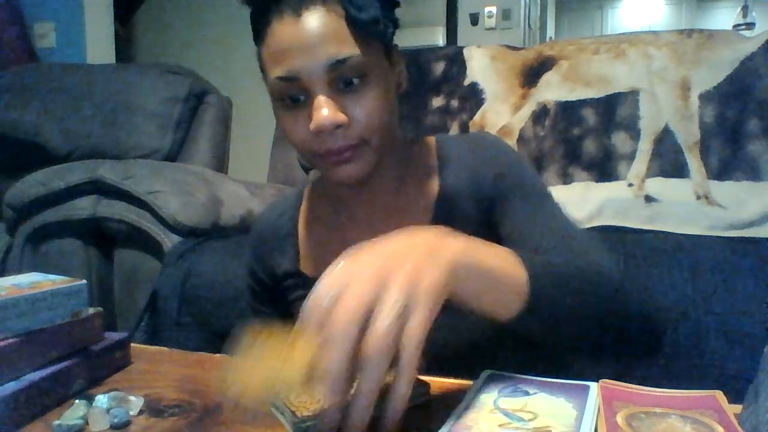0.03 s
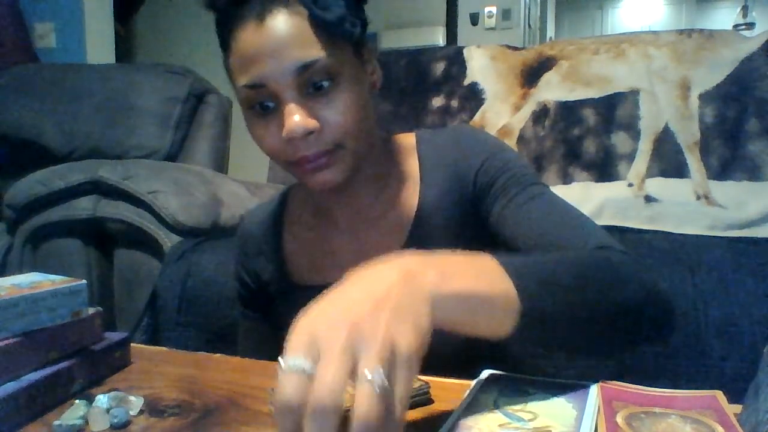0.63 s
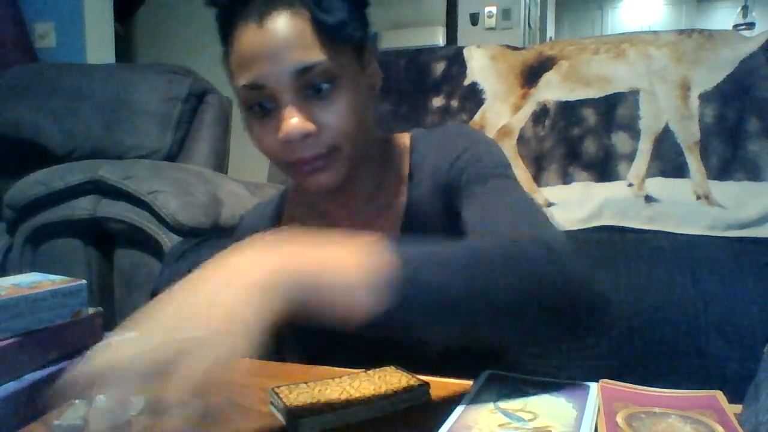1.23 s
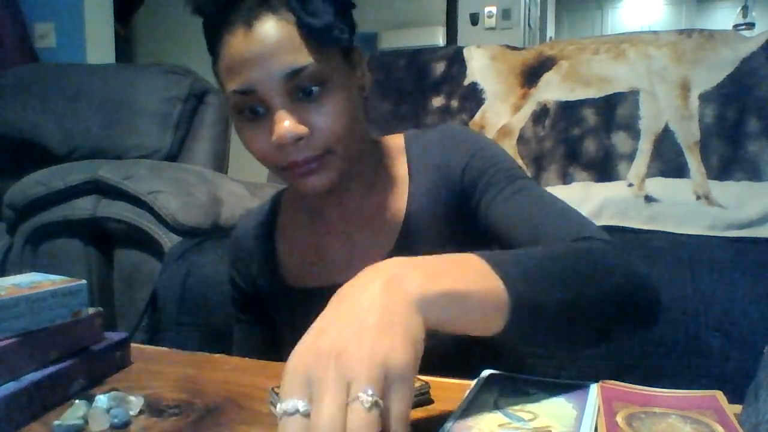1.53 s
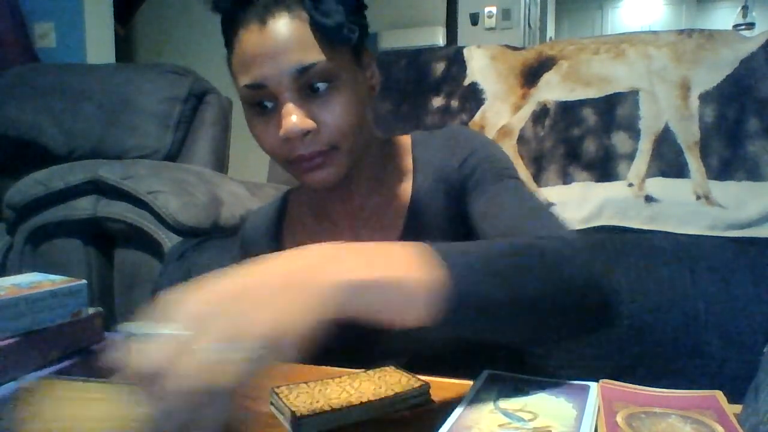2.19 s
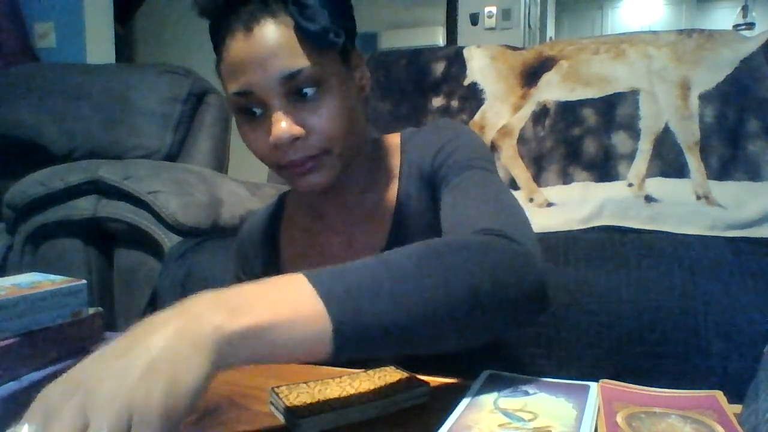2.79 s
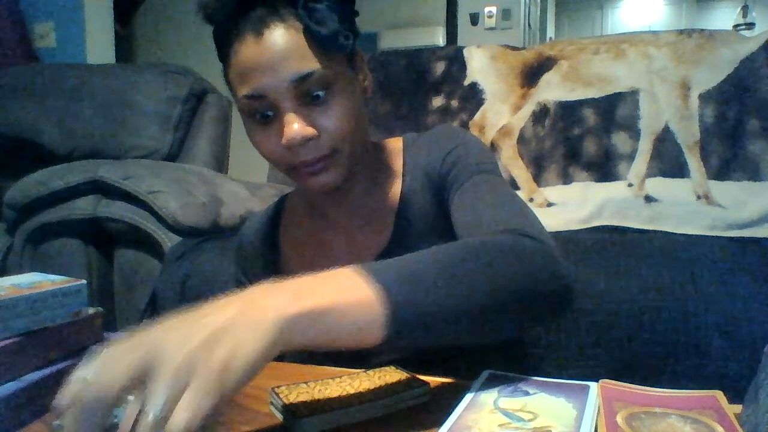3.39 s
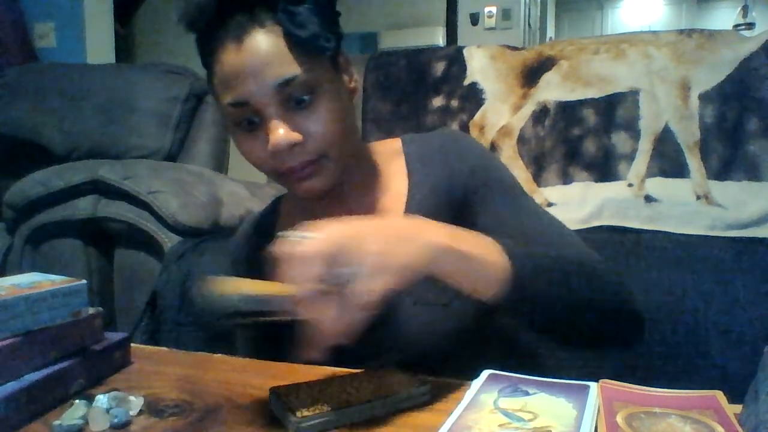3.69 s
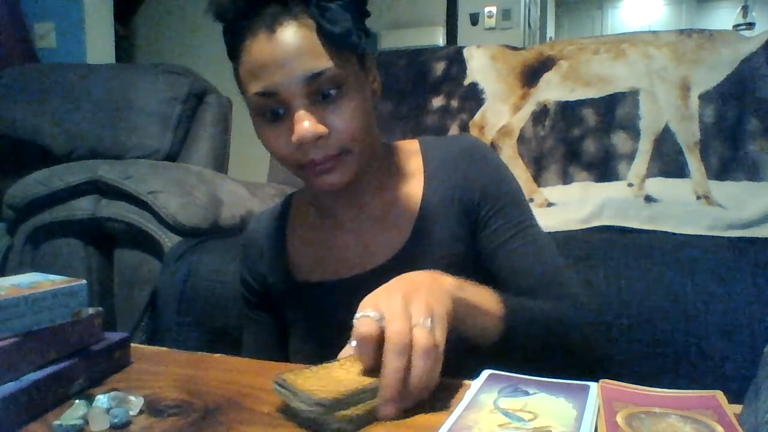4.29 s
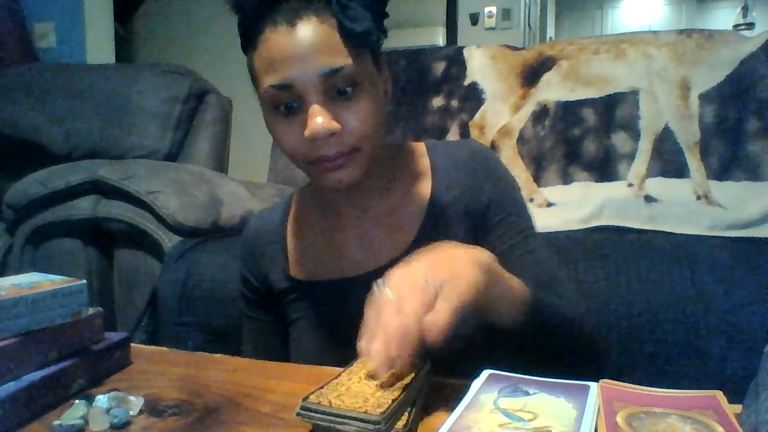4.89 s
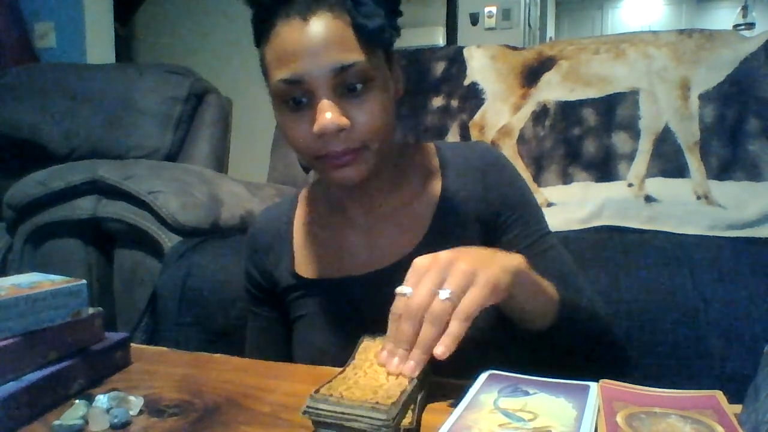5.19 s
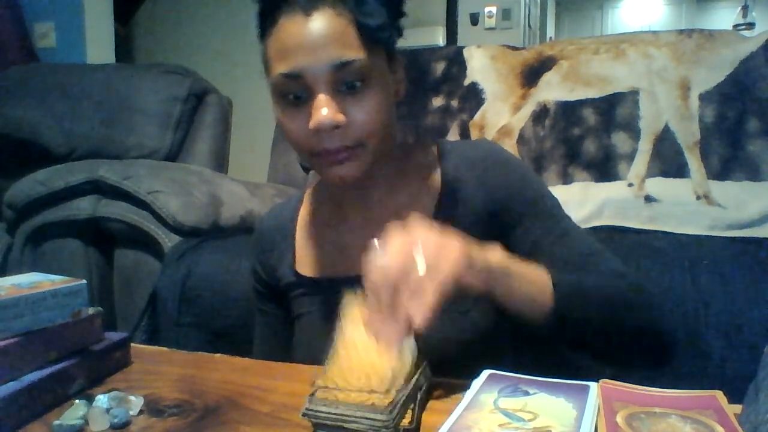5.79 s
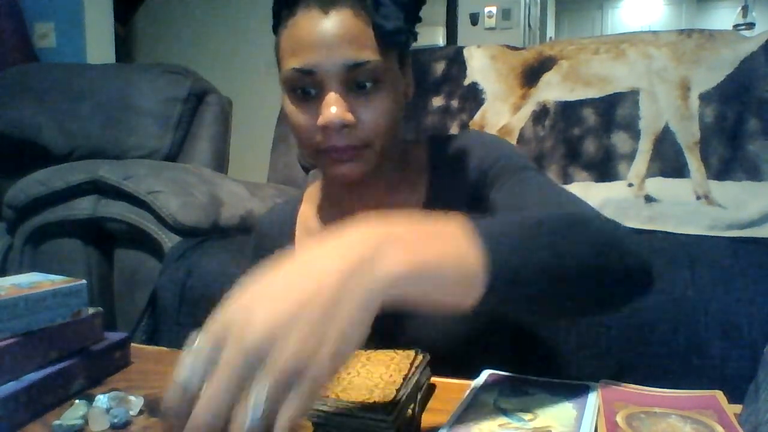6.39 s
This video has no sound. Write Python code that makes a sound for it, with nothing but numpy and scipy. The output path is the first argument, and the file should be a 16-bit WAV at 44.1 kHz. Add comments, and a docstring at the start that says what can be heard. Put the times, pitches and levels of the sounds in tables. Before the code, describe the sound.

Packets of cards slap onto a wooden table with short knocks, ticks and soft slides, over microphone hiss in a quiet room.

```python
"""A bright microphone hiss comes up over a faint hum, and at once cards slap onto a wooden table.
A deck is being cut and restacked in a quiet room. Each packet lands in a quick cluster of slaps,
thumps and clacks, and the table top rings. Card edges tick and slide, fingers bump the wood, and
one packet judders over it by stick and slip. The hiss swells briefly after each landing."""
import sys
import numpy as np
from scipy import signal
from scipy.fft import rfft, irfft
from scipy.io import wavfile

SR = 44100
rng = np.random.default_rng(int(sys.argv[2]) if len(sys.argv) > 2 else 0)


def bounce(signal):
    """Save signal as a 16-bit WAV file at the path given by the first command-line argument."""
    frames = np.transpose(np.atleast_2d(signal))
    limited = np.clip(frames, -1, 1)
    pcm = np.round(limited * 32767).astype(np.int16)
    wavfile.write(sys.argv[1], SR, pcm)


N = 292824
TIME_S = np.arange(N) / SR
EVENT_S = TIME_S[:SR // 2]
CUTOFF_HZ = 15700


def from_db(db):
    """Decibels to gain."""
    return 10 ** (np.asarray(db) / 20)


def unit_rms(x):
    """Scale to rms 1."""
    return x / np.sqrt(np.mean(x ** 2) + 1e-20)


def add(out, start_s, sound):
    """Mix a sound in at start_s."""
    start = round(start_s * SR)
    out[start:start + len(sound)] += sound[:N - start]


def colour(x, spectrum):
    """Filter by (freq_hz, gain_db) points."""
    hz, db = np.transpose(spectrum)
    bins_hz = np.maximum(np.fft.rfftfreq(len(x), 1 / SR), 1)
    gain = from_db(np.interp(np.log(bins_hz), np.log(hz), db))
    return irfft(rfft(x) * gain, len(x))


def band(x, hz, octaves):
    """Band-pass that keeps the rms of white noise."""
    low_hz, high_hz = hz * 2 ** (-octaves / 2), min(hz * 2 ** (octaves / 2), CUTOFF_HZ + 2000)
    sos = signal.butter(2, [low_hz, high_hz], "band", fs=SR, output="sos")
    return signal.sosfilt(sos, x) * np.sqrt(SR / 2 / (high_hz - low_hz))


def resonate(x, hz, width_hz):
    """Two-pole resonator, peak gain 1."""
    radius = np.exp(-np.pi * width_hz / SR)
    feedback = [1, -2 * radius * np.cos(2 * np.pi * hz / SR), radius ** 2]
    return signal.lfilter(np.array([1, 0, -1]) * (1 - radius ** 2) / 2, feedback, x + 1e-18)


def drift(rate_hz):
    """Random wander, rms 1."""
    knots = rng.standard_normal(4096)
    return unit_rms(np.interp(TIME_S * rate_hz, np.arange(len(knots)), knots))


def decay(t60_s):
    """Exponential decay from 1."""
    return from_db(-60 * EVENT_S / t60_s)


def onset(rise_s):
    """Smooth rise from 0 to 1."""
    return 1 - np.exp(-(EVENT_S / rise_s) ** 2)


def soft_blow(hz, t60_s, rise_s):
    """A damped sine that builds as a soft body compresses."""
    return np.sin(2 * np.pi * hz * EVENT_S) * decay(t60_s) * onset(rise_s)


def contact(level_db, hz, t60_s, octaves, rise_s=0.00057):
    """Many tiny contacts merge into a short noise burst."""
    burst = rng.standard_normal(len(EVENT_S)) * decay(t60_s) * (1 - np.exp(-EVENT_S / rise_s))
    return from_db(level_db) * band(burst, hz, octaves)


# Reflection spectrum: freq_hz, gain_db
REFLECTIONS = [(40, -15), (100, 0.5), (200, 0.5), (400, 2), (700, -3), (1200, -5.5), (2400, -4),
               (3400, 1.5), (6000, -3), (14000, -9)]


def room(x, wet_db, t60_s):
    """Diffuse reflections build just after the direct sound."""
    tail = rng.standard_normal(len(EVENT_S)) * decay(t60_s) * onset(rise_s=0.002)
    tail = colour(tail / np.linalg.norm(tail), REFLECTIONS)
    return x + from_db(wet_db) * signal.fftconvolve(x, tail)[:len(x)]


# Band level fluctuation: freq_hz, depth_db
SHIMMER_DEPTH = [(300, 3), (1500, 5), (5000, 6), (8000, 4), (11000, -1), (16000, -10)]


def shimmer(x, hold_s, size=1024):
    """Narrow bands swell and fade independently; output rms 1."""
    bands = signal.stft(x, nperseg=size)[2]
    lags_s = np.arange(-30, 31) * size / 2 / SR
    smoothing = np.exp(-(lags_s / hold_s) ** 2)[None]
    wander = unit_rms(signal.fftconvolve(rng.standard_normal(bands.shape), smoothing, "same"))
    depth_db = np.interp(np.fft.rfftfreq(size, 1 / SR), *np.transpose(SHIMMER_DEPTH))[:, None]
    return unit_rms(signal.istft(bands * from_db(depth_db * wander), nperseg=size)[1][:N])


# Hum tones: pitch_hz, level_db
HUM_TONES = [(91.5, -78.5), (134.6, -77.5), (242.2, -79), (360.7, -81)]


def hum(waver_db=3.0, waver_rad=0.62):
    """Faint low tones waver in level and phase."""
    out = np.zeros(N)
    for pitch_hz, level_db in HUM_TONES:
        peak = np.sqrt(2) * from_db(level_db + waver_db * drift(4.2))
        out += peak * np.sin(2 * np.pi * pitch_hz * TIME_S + waver_rad * drift(5.1))
    return out


# Room air spectrum: freq_hz, density_db
AIR_SPECTRUM = [(25, 4), (60, -4), (90, 3), (180, -0.5), (300, 0.5), (420, -4.5), (700, -7.5),
                (1300, -14.5), (2000, -14.5), (3000, -21.5), (4500, -24.5), (9000, -29.5)]


def air(level_db=-66.5, wander_db=1.4, follow_ratio=0.15):
    """Low room noise wanders and slightly follows the hiss's slow level."""
    noise = shimmer(colour(rng.standard_normal(N), AIR_SPECTRUM), hold_s=0.16)
    trend_db = np.interp(TIME_S, *np.transpose(HISS_TREND))
    follow_db = follow_ratio * (trend_db - trend_db.mean())
    return noise * from_db(level_db + follow_db - wander_db * drift(3.018))


# Slow hiss level: time_s, level_db
HISS_TREND = [(0.35, -58), (1.33, -55.5), (1.8, -58.5), (2.52, -59), (2.66, -57), (3.73, -62.5),
              (3.94, -62.5), (4.17, -58.5), (4.7, -63), (5.01, -67.5), (6.34, -66), (6.64, -61.5)]
# Hiss spectrum: freq_hz, density_db
HISS_SPECTRUM = [(1500, -36), (3400, -17.5), (3900, -13), (4200, -6.5), (4700, -7.5), (6000, -4.5),
                 (6900, -0.5), (7800, -3.5), (8900, -6.5), (10600, -12), (12100, -13), (13200, -14),
                 (15700, -28)]
# Narrow hiss peaks: pitch_hz, width_hz, relative_db
HISS_PEAKS = [(3880, 90, -15.5), (5740, 320, -5), (6950, 470, 1), (13750, 280, -2)]


def hiss(on_s=0.16, rise_s=0.026, off_db=-40, swell_db=7.5, swell_s=0.072, flicker_db=0.87, trim_db=0.5):
    """A small close microphone hisses, coming up before the first landing and swelling after each."""
    white = rng.standard_normal(N)
    whistles = sum(from_db(db - 6) * resonate(white, hz, width_hz) for hz, width_hz, db in HISS_PEAKS)
    noise = shimmer(colour(white + whistles, HISS_SPECTRUM), hold_s=0.045)
    trend_db = np.interp(TIME_S, *np.transpose(HISS_TREND)) + trim_db
    fade_in_db = off_db * (1 - np.tanh((TIME_S - on_s) / rise_s)) / 2
    swells = [(TIME_S > start_s) * np.exp(-np.abs(TIME_S - start_s) / swell_s)
              for start_s, *_ in LANDINGS]
    return noise * from_db(trend_db + fade_in_db + swell_db * np.max(swells, axis=0) + flicker_db * drift(40))


# Card stock resonances: pitch_hz, width_hz, relative_db
CARD_MODES = [(1286, 78, 15), (1470, 35, -30), (1600, 30, -40), (2286, 59, 17.5), (2730, 220, 7),
              (4460, 110, -9)]


def card(x, ring_db=-11):
    """Stiff card colours whatever touches it."""
    ring = sum(from_db(db) * resonate(x, hz, width_hz) for hz, width_hz, db in CARD_MODES)
    return x + from_db(ring_db) * ring


# Card strokes: peak_s, half_width_s, relative_db, centre_hz
STROKES = [(1.658, 0.065, -57, 670), (2.447, 0.0075, -46, 1190), (2.643, 0.038, -63, 1260),
           (2.69, 0.027, -46, 820), (2.932, 0.072, -60.5, 2250), (3.21, 0.14, -60, 2580),
           (3.403, 0.054, -61, 2270), (5.355, .02, -66, 1900), (5.791, 0.04, -58, 860),
           (5.965, 0.038, -60.5, 1930), (6.45, 0.028, -47, 3200), (6.452, .03, -53, 8500),
           (6.471, 0.074, -55.5, 1920), (6.453, 0.035, -50.5, 507)]


def slides(grain_db=4, gain_db=-8):
    """Card rubs on card in uneven grains that swell and die with the stroke."""
    out = np.zeros(N)
    for peak_s, half_width_s, relative_db, centre_hz in STROKES:
        grains = unit_rms(rng.standard_normal(N) * from_db(grain_db * drift(400)))
        stroke = np.exp(-2 * ((TIME_S - peak_s) / half_width_s) ** 2)
        out += from_db(relative_db + gain_db) * band(grains * stroke, centre_hz, octaves=1.2)
    return card(out)


# Edge and fingernail ticks: start_s, level_db, centre_hz
EDGE_TICKS = [(0.22, -33, 3700), (1.0891, -28, 2400), (1.0897, -22.5, 5060), (1.099, -34, 9500),
              (1.1178, -25.5, 7000), (3.109, -48, 2530), (3.177, -47.5, 2520), (3.217, -40.5, 2750),
              (3.226, -38, 2450), (3.324, -50, 2530), (3.343, -45, 2460), (3.9205, -42, 1980),
              (3.931, -35, 1080), (5.3402, -54, 1760), (5.9513, -53.5, 1700), (6.4224, -37, 3220),
              (6.431, -40.5, 2970)]


def ticks(t60_cycles=37):
    """Single card edges and nails tick; the higher, the shorter."""
    out = np.zeros(N)
    for start_s, level_db, centre_hz in EDGE_TICKS:
        add(out, start_s, contact(level_db, centre_hz, t60_s=t60_cycles / centre_hz, octaves=0.85))
    return room(card(out), wet_db=-4.5, t60_s=0.35)


# Packet resonances: pitch_hz, width_hz, relative_db
PACKET_MODES = [(805, 84, -16), (1300, 41, -7), (2100, 150, -26)]


def judder(push_s=2.62, brake_s=2.704, braking_s=0.0051, fast_hz=826, slow_hz=234.7,
           press_db_per_s=188, release_db_per_s=268):
    """A packet sticks and slips, pushed ever harder; its groan drops in pitch as it brakes."""
    before_s, after_s = np.maximum(brake_s - TIME_S, 0), np.maximum(TIME_S - brake_s, 0)
    slip_hz = slow_hz + (fast_hz - slow_hz) * np.exp(-after_s / braking_s)
    jitter = 1 + 0.162 * drift(500)
    phase = 2 * np.pi * np.cumsum(slip_hz * jitter) / SR
    force_db = -46.5 - press_db_per_s * before_s - release_db_per_s * after_s
    roughness_db = 4 * drift(300)
    force = from_db(force_db + roughness_db) * (TIME_S > push_s)
    slips = from_db(-1.5) * force * (np.sin(phase) + 0.092 * np.sin(2 * phase))
    friction = from_db(10) * force * rng.standard_normal(N) * (1 + np.cos(phase))
    ring = sum(from_db(db) * resonate(friction, hz, width_hz) for hz, width_hz, db in PACKET_MODES)
    return room(slips + ring, wet_db=4.5, t60_s=0.049)


# Table top modes: pitch_hz, t60_s, middle_db, side_db
WOOD_MODES = [(50, 0.59, 6, -8), (99, 0.11, -20, -8), (127.2, 0.09, -0.5, 4.5), (172.3, 0.31, 7, 6),
              (237, .16, -16.5, 6), (265.4, 0.25, 11, -10), (301, 0.09, -2.5, -5), (328, 0.1, 12.5, -18),
              (359, 0.055, 8.5, -1.5), (412, 0.15, -16, -1), (457, 0.089, 7, 5), (523, 0.04, -15, 11),
              (554, 0.035, 0.5, -9.5), (612, 0.091, -2.5, 11), (714, .13, 12, -28), (794, 0.041, 12.5, -5),
              (916, 0.1, -27, -13), (1002, 0.047, 23, -12.5), (1190, .07, -11.5, 4), (1730, 0.11, -12, -16),
              (1950, .13, 12, -9), (2270, .14, -11, 10)]


def table_top(blow, place):
    """The wood rings; the place struck (0 middle, 1 side) weights its modes."""
    out = np.zeros(len(blow))
    for pitch_hz, t60_s, middle_db, side_db in WOOD_MODES:
        gain = from_db(np.interp(place, [0, 1], [middle_db, side_db]))
        out += gain * resonate(blow, pitch_hz, width_hz=np.log(1000) / np.pi / t60_s)
    return out


# Finger and wrist bumps: start_s, level_db, pitch_hz
HAND_BUMPS = [(1.079, -36.5, 133), (1.413, -48, 152), (1.435, -45.5, 164), (1.548, -56, 156),
              (1.825, -49, 240), (2.649, -48, 198), (4.042, -54, 50), (4.855, -52, 240), (5.034, -50, 235),
              (6.429, -67, 150)]


def bumps(t60_cycles=10):
    """Soft flesh stirs the table's low modes."""
    out = np.zeros(N)
    for start_s, level_db, pitch_hz in HAND_BUMPS:
        add(out, start_s, from_db(level_db) * soft_blow(pitch_hz, t60_cycles / pitch_hz, rise_s=0.0046))
    return room(out + table_top(out, place=0.5), wet_db=-5, t60_s=0.2)


# Packet impacts: start_s, place (0 middle, 1 side), thump_db, thump_hz, slap_db, slap_hz,
# clack_db, clack_hz, snap_db, snap_hz
LANDINGS = [(0.1897, 0.095, -39, 149, -22.5, 532, -32.5, 1400, -52.5, 7100),
            (0.1993, 0.79, -29, 70, -22.5, 780, -46, 1300, -35, 8500),
            (0.221, 0.11, -27, 244, -36, 760, -27.5, 1210, -32, 7400),
            (1.0878, 0.77, -27, 89, -19.5, 587, -25.5, 1090, -31.5, 7000),
            (1.0911, 0.85, -17.5, 180, -18.5, 900, -42, 2340, -62, 8000),
            (2.4501, 0.48, -47, 240, -32, 870, -39, 1090, -39, 5000),
            (2.4587, 0.81, -34.5, 270, -26.5, 875, -34.5, 1300, -55, 5000),
            (2.469, 0.19, -28, 168, -29, 407, -49, 1400, -60, 8000),
            (3.934, 0.013, -24, 281, -15, 442, -33, 2040, -31, 11900),
            (3.9459, 0, -22, 139, -42, 410, -57, 1100, -37, 9000),
            (3.9687, 0.14, -32, 215, -29.5, 530, -46, 2000, -29.5, 8800),
            (6.4216, 0.4, -55, 350, -48, 514, -39.5, 1210, -43.5, 11000)]


def clacks_and_snaps(lag_s=0.0008):
    """Edges clack on the wood and cards snap shut, too muffled by the stack to ring."""
    clacks, snaps = np.zeros((2, N))
    for start_s, *_, clack_db, clack_hz, snap_db, snap_hz in LANDINGS:
        add(clacks, start_s + lag_s, contact(clack_db, clack_hz, t60_s=0.019, octaves=1))
        add(snaps, start_s + lag_s, contact(snap_db, snap_hz, t60_s=0.01, octaves=0.86))
    return room(clacks, wet_db=-0.5, t60_s=0.26) + room(snaps, wet_db=-5, t60_s=0.24)


def knocks(ring_db=5.5, drop_db=-11, drop_after_s=0.097, drop_s=0.0046):
    """A packet's weight thumps, its face slaps; the table's ring drops abruptly after about 0.1 s."""
    out = np.zeros(N)
    tail_drop = from_db(drop_db * (1 + np.tanh((EVENT_S - drop_after_s) / drop_s)) / 2)
    for start_s, place, thump_db, thump_hz, slap_db, slap_hz, *_ in LANDINGS:
        thump = from_db(thump_db) * soft_blow(thump_hz, t60_s=0.031, rise_s=0.00098)
        slap = from_db(slap_db) * soft_blow(slap_hz, t60_s=0.014, rise_s=0.0011)
        ring = from_db(ring_db) * table_top(thump + slap, place)
        add(out, start_s, room(thump + slap + ring, wet_db=-5.5, t60_s=0.33) * tail_drop)
    return out


def scene():
    """All sources at one microphone."""
    cards = knocks() + bumps() + clacks_and_snaps() + ticks() + slides() + judder()
    return (cards + hiss() + air() + hum())[None]


def record(dry, low_cut_hz=55):
    """The microphone thins the deep bass; the top is cut steeply."""
    low_cut = signal.butter(1, low_cut_hz, "high", fs=SR, output="sos")
    high_cut = signal.ellip(10, 0.1, 70, CUTOFF_HZ, fs=SR, output="sos")
    return signal.sosfilt(high_cut, signal.sosfilt(low_cut, dry))


dry = scene()
out = record(dry)
bounce(out)
```